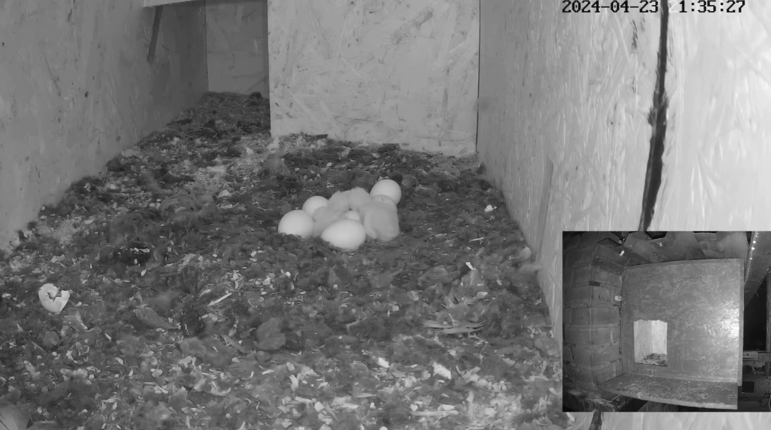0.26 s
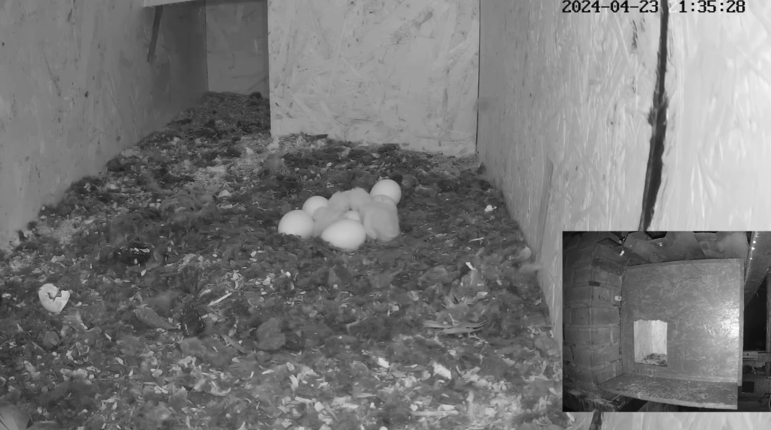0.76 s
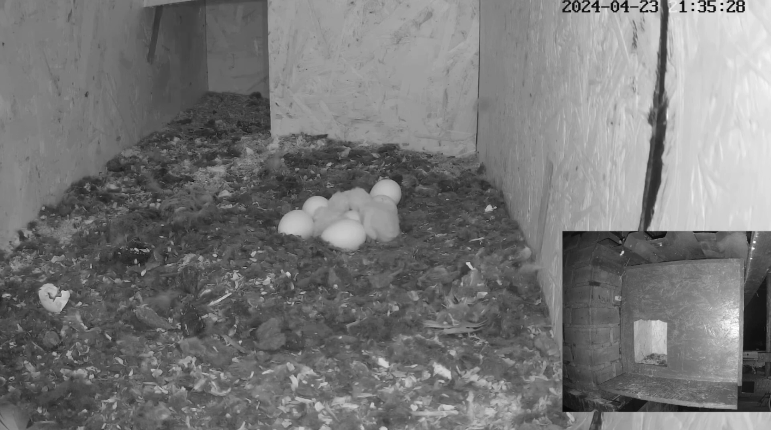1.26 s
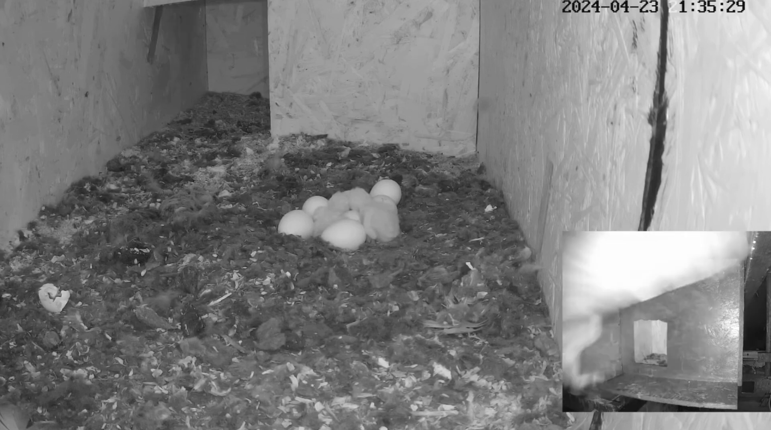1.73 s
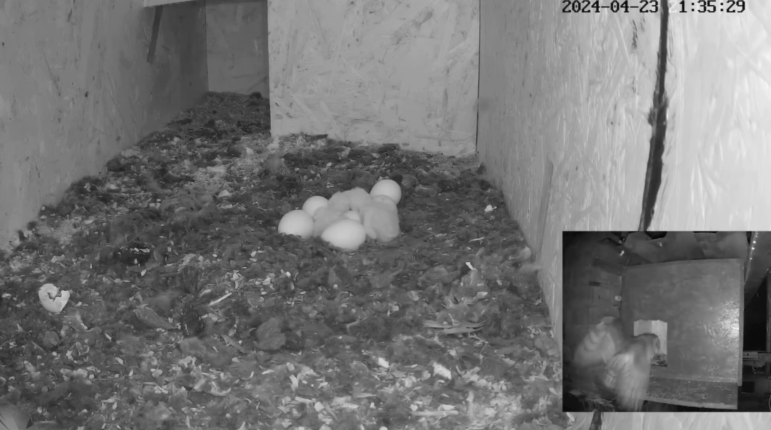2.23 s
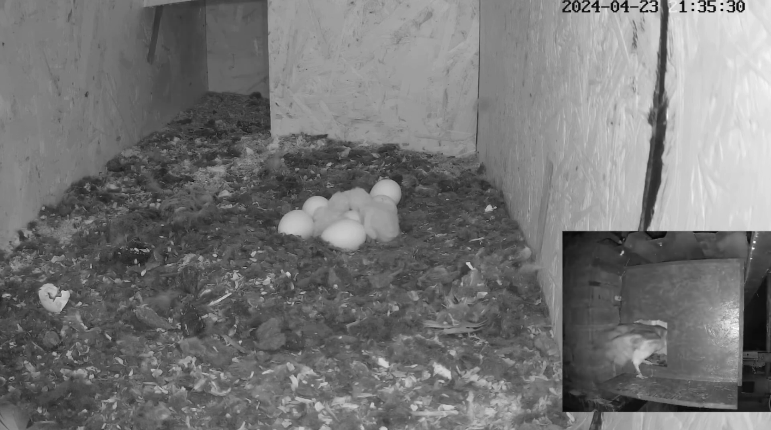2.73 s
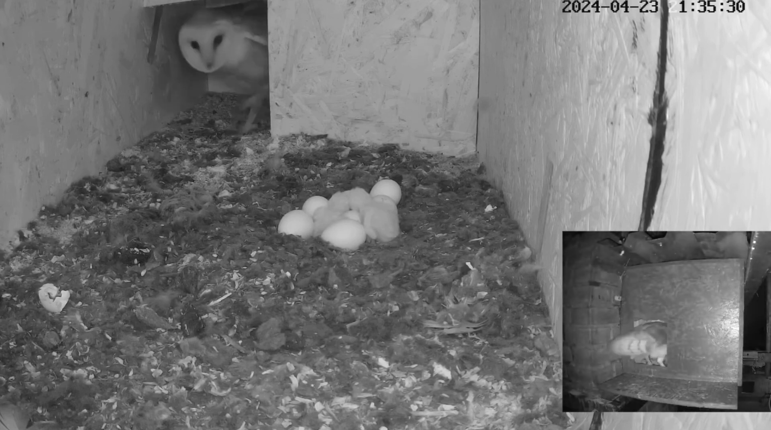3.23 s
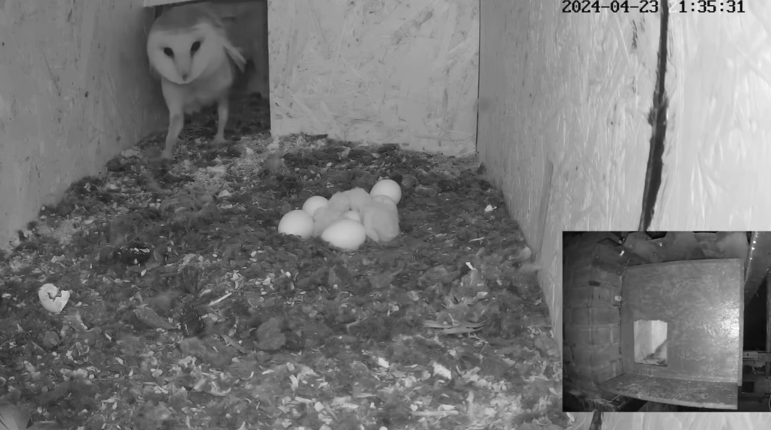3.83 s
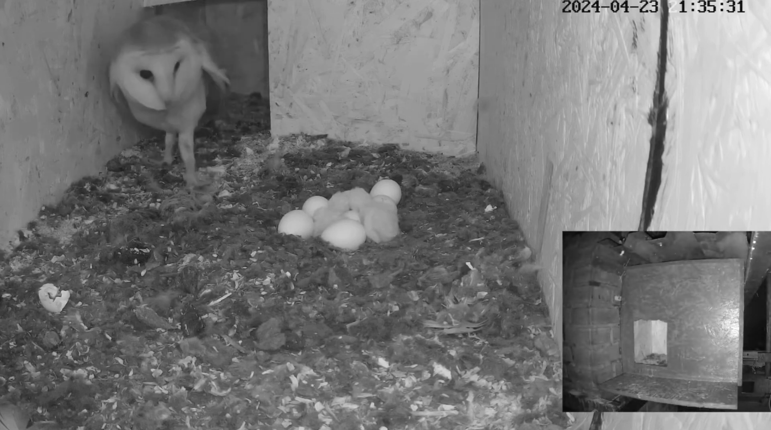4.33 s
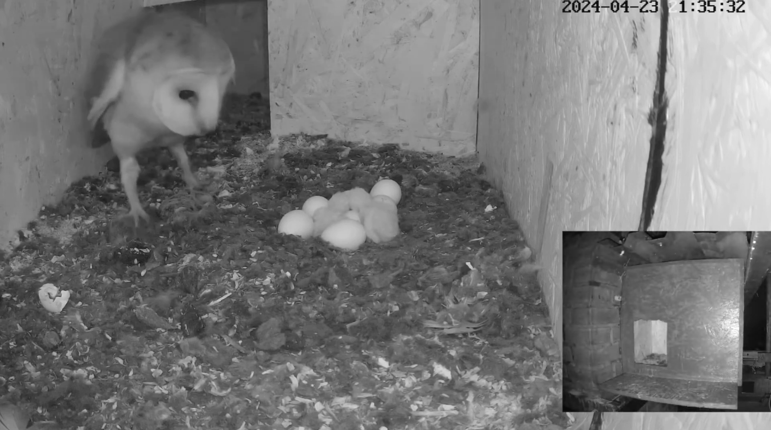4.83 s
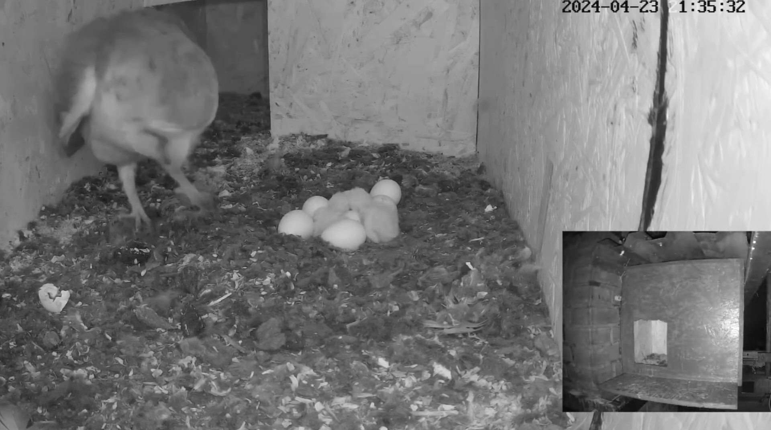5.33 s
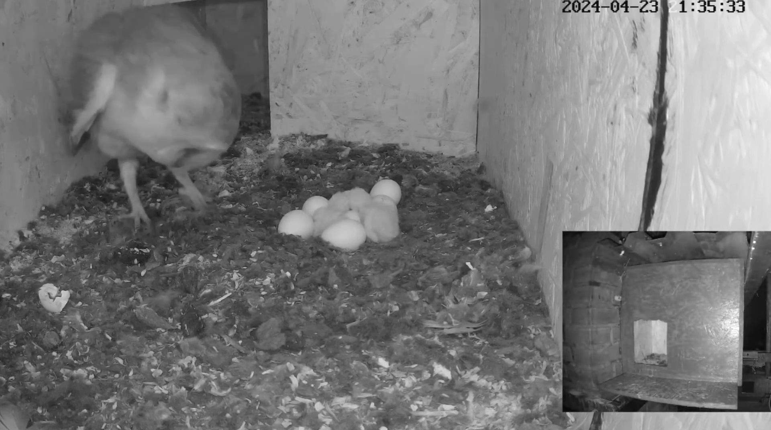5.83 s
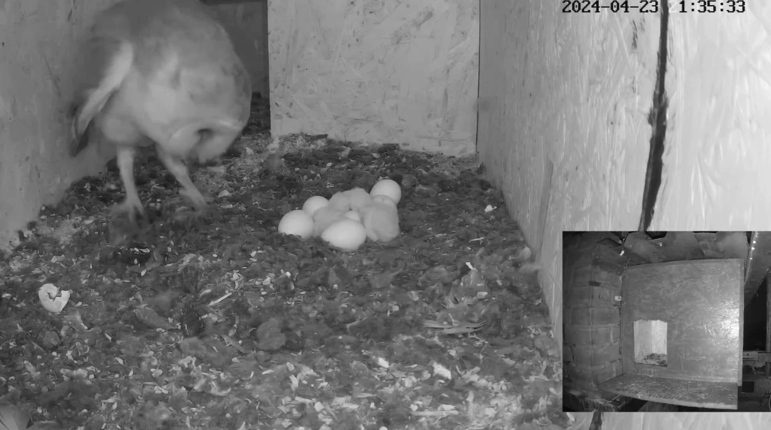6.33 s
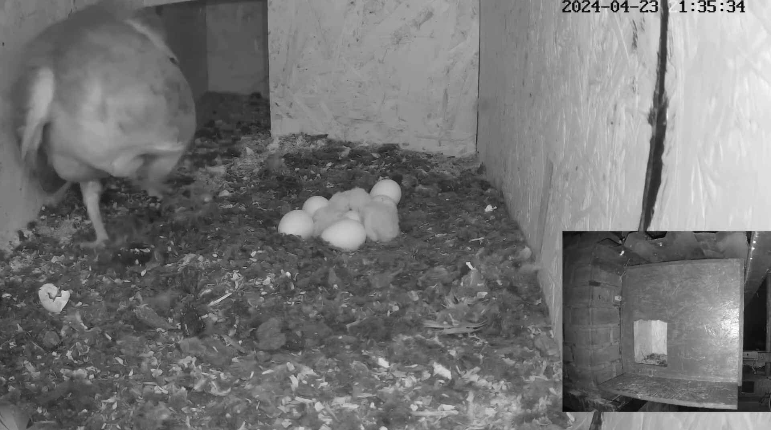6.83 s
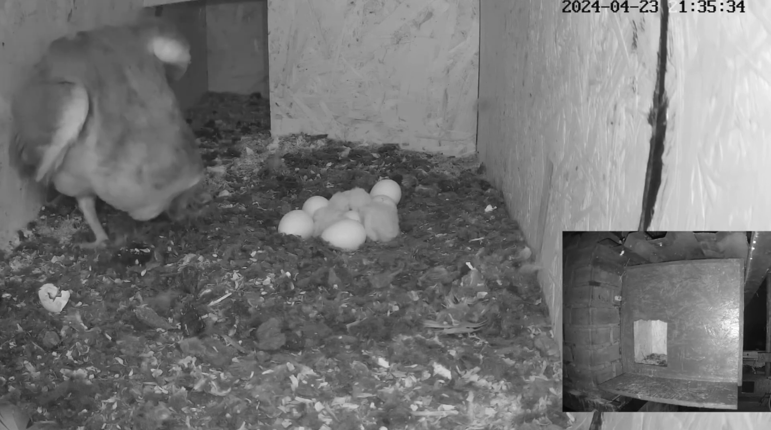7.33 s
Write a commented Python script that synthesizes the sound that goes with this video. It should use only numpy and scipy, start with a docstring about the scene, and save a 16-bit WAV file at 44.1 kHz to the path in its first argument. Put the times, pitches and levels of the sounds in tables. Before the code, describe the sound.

Barn owl chicks chitter in six quick, high trills of raspy rising notes, with a few thin peeps, inside a wooden nest box. After the first trill, wingbeats push air at the microphone and an adult lands on the box with a loud thump. Its claws scrabble and knock on the wood, then it pads in with soft steps and shuffles. The small, close microphone adds a steady hiss and low rumble.

```python
"""Barn owl chicks chitter in six quick trills inside a wooden nest box at night. Each syllable is a rasp, a
rising sweep and soft trailing notes, made in the syrinx and coloured by the throat and the close walls. An
adult lands on the box with a thump, scrabbles at the entrance and walks in over the litter, its feet ringing
the boards and panels. Its wings push air at a small microphone in swells of low rumble, over the microphone's
own steady hiss."""
import sys
import numpy as np
from scipy import signal
from scipy.fft import rfft, irfft, next_fast_len
from scipy.io import wavfile
from scipy.ndimage import uniform_filter1d, map_coordinates

SR = 44100
rng = np.random.default_rng(int(sys.argv[2]) if len(sys.argv) > 2 else 0)


def generate_wav(signal):
    """Clip the signal to [-1, 1] and save it as 16-bit WAV at the path in sys.argv[1]."""
    frames = np.transpose(np.atleast_2d(signal))
    scaled = np.clip(frames, -1, 1) * 32767
    pcm = np.round(scaled).astype(np.int16)
    wavfile.write(sys.argv[1], SR, pcm)


N = 334278
TIME = np.arange(N) / SR

# the boom of the heavy boards: pitch_hz, level_db, t60_s
BOARD_BOOM = [(132.7, -5, 0.3), (153.8, -10.5, 0.47), (229.3, -8, 0.33), (289, -56, 0.025),
              (346.7, 3, 0.17), (378.7, -0.5, 0.089), (428, 0.5, 0.021), (554, -11, 0.18),
              (654, -35, 0.066)]
# soft, heavy pushes that rock the floor: start_s, level_db
FLOOR_PUSHES = [(1.491, -39.5), (5.025, -39.5), (7.204, -42)]


def amp(db):
    """Decibels to gain."""
    return 10 ** (np.asarray(db) / 20)


def unit_rms(x):
    """Scales to rms 1."""
    return x / np.sqrt(np.mean(x ** 2) + 1e-20)


def unit_crest(x):
    """Scales so that the loudest 10 ms have rms 1."""
    return x / np.sqrt(uniform_filter1d(x ** 2, size=441).max() + 1e-20)


def gain_at(curve, hz):
    """Reads the gain of an EQ curve on a log-frequency axis."""
    curve_hz, curve_db = np.transpose(curve)
    return amp(np.interp(np.log(hz + 1), np.log(curve_hz + 1), curve_db))


def equalise(x, curve):
    """Filters by an EQ curve."""
    size = next_fast_len(len(x))
    return irfft(rfft(x, size) * gain_at(curve, np.fft.rfftfreq(size, 1 / SR)), size)[:len(x)]


def wander(count, hz):
    """Smooth random motion of rms 1 that changes about hz times a second."""
    steps = np.arange(count) * hz / SR
    return unit_rms(map_coordinates(rng.standard_normal(8192), [steps], order=3, mode="wrap"))


def progress(length_s):
    """Runs from 0 to 1 over a note."""
    return np.linspace(0, 1, round(length_s * SR))


def arch(u, crest):
    """Rises from 0 to 1 at the crest and falls back."""
    return np.interp(u, [0, crest, 1], [0, 1, 0])


def add(mix, start_s, sound):
    """Mixes a sound in at its start time."""
    part = mix[max(round(start_s * SR), 0):][:len(sound)]
    part += sound[:len(part)]


def microphone_hiss(level_db=-56.5):
    """The microphone's own steady hiss and rumble."""
    # noise floor EQ: freq_hz, gain_db
    hiss_eq = [(25, -3), (65, -1.5), (110, -3.5), (330, -9), (1000, -14), (2000, -17.5), (5000, -21),
               (13500, -25)]
    return amp(level_db) * unit_rms(equalise(rng.standard_normal(N), hiss_eq))


def draught():
    """Slow air pressure on the microphone, strongest under the wingbeats."""
    # fader moves of the moving air: time_s, level_db
    fader = [(0.0, -54), (0.95, -53.5), (1.05, -38), (1.45, -41.5), (1.68, -51.5), (3.5, -53.5),
             (4.16, -58.5), (4.28, -48), (4.96, -58), (5.0, -48.5), (5.51, -59), (7.41, -50), (7.58, -55)]
    # its sub-heavy EQ: freq_hz, gain_db
    air_eq = [(10, -9), (22, -5), (38, 0.5), (52, -7.5), (70, -19.5), (110, -30.5), (250, -35), (600, -82)]
    air = equalise(rng.standard_normal(N), air_eq)
    steady_air = air / np.sqrt(uniform_filter1d(air ** 2, size=8000))
    return steady_air * amp(np.interp(TIME, *np.transpose(fader)))


def ring(force, modes):
    """A force drives damped wooden modes."""
    t = np.arange(SR // 4) / SR
    response = sum(amp(db) * np.exp(-np.log(1000) * t / t60) * np.sin(2 * np.pi * hz * t)
                   for hz, db, t60 in modes)
    return signal.fftconvolve(force, response)[:len(force)]


def floor_boards(sway_hz=43, sway_decay_s=0.12, shove_s=0.0029, shove_db=3):
    """The owl's weight shoves the floor and rocks it; its shuffling keeps the boards murmuring."""
    # feet and feathers shuffling on the boards: time_s, level_db
    shuffle_fader = [(2.3, -80), (2.72, -56.5), (3.03, -66), (4.52, -73), (4.86, -63), (5.4, -69.5)]
    thuds, t = np.zeros(N), np.arange(SR // 3) / SR
    sway = np.exp(-t / sway_decay_s) * np.sin(2 * np.pi * sway_hz * t)
    shove = t / shove_s * (2 - t / shove_s) * np.exp(1 - t / shove_s)
    for start_s, db in FLOOR_PUSHES:
        add(thuds, start_s, amp(db) * (sway + amp(shove_db) * shove))
    shuffle_gain = amp(np.interp(TIME, *np.transpose(shuffle_fader), left=-100, right=-100))
    friction = rng.standard_normal(N) * amp(2.2 * wander(N, 60))
    return thuds + shuffle_gain * unit_rms(ring(friction, BOARD_BOOM))


def judder(press, modes):
    """Each mode gathers the energy of many small contacts and leaks it away; the contacts jog its phase."""
    t, out = np.arange(len(press)) / SR, 0
    for hz, db, t60 in modes:
        retained = np.exp(-2 * np.log(1000) / (t60 * SR))
        energy = signal.lfilter([1], [1, -retained], press ** 2)
        phase = 2 * np.pi * (hz * t + rng.random()) + wander(len(t), hz / 6)
        out = out + amp(db) * np.sqrt(energy / energy.max()) * np.sin(phase)
    return out


def footfall(rise_s, decay_s, boom_db, knock_db, scrape_db, bright_hz, focus_db_per_octave=0):
    """A cluster of tiny contacts booms the boards, knocks the panels and scrapes the wood."""
    # the knock of the thin panels: pitch_hz, level_db, t60_s
    panel_knock = [(541, -6.5, 0.099), (696, 2.5, 0.012), (788, -4, 0.024), (964, 1, 0.043),
                   (1066, 2, 0.015), (1396, -1, 0.064), (1680, -6, 0.038), (1847, -1.5, 0.058),
                   (2170, -3, 0.064)]
    # EQ of claws on wood: freq_hz, gain_db
    scrape_eq = [(600, -30), (1250, -6), (1700, -3), (2050, -3.5), (2500, -1), (2900, 0.5), (3800, -4),
                 (5400, -4), (13000, -4)]
    t = np.arange(SR // 3) / SR
    press = np.minimum(t / rise_s, 1) * np.exp(-np.maximum(t - rise_s, 0) / decay_s)
    grit = press * rng.standard_normal(len(t)) * amp(3 * wander(len(t), 747))
    lowpass = signal.butter(3, bright_hz, fs=SR)
    scrape = signal.lfilter(*lowpass, equalise(grit, scrape_eq))
    # claws wake the panels' high modes, soft pads the low ones
    tilt_db = np.clip(scrape_db - knock_db, -7, 9)
    panels = [(hz, db + tilt_db * np.log2(hz / 1000), t60) for hz, db, t60 in panel_knock]
    # focus favours the boards' main mode, as a soft pad does
    boards = [(hz, db - focus_db_per_octave * min(abs(np.log2(hz / 343)), .5), t60)
              for hz, db, t60 in BOARD_BOOM]
    boom = amp(boom_db) * unit_crest(judder(press, boards))
    knock = amp(knock_db) * unit_crest(judder(press, panels))
    return boom + knock + amp(scrape_db) * unit_crest(scrape)


def footwork():
    """The adult's sharp claw strikes, padding steps, and the brief contact of each heavy push."""
    # claws scrabbling on wood: start_s, rise_s, decay_s, boom_db, knock_db, scrape_db, bright_hz
    claw_strikes = [(1.415, 0.0055, 0.021, -39.5, -35.5, -44.5, 4230),
                    (1.437, 0.0025, 0.025, -39, -43, -43.5, 5400),
                    (1.462, 0.0046, 0.013, -69, -58, -44, 5370),
                    (1.49, 0.0021, 0.0046, -38.5, -46.5, -46, 3000),
                    (1.55, .01, 0.11, -68, -76, -60.5, 3200), (1.819, 0.00075, 0.016, -54, -48, -50, 2600),
                    (2.020, 0.015, 0.014, -41.5, -40.5, -36, 3900),
                    (2.128, 0.00087, .011, -51, -46, -35, 2720), (2.33, .001, .005, -72, -66, -58, 3500),
                    (2.505, 0.00089, 0.055, -43, -55.5, -53.5, 3200),
                    (2.950, 0.0018, 0.0049, -52.5, -52, -55.5, 2200),
                    (6.653, 0.0014, 0.0031, -55.5, -57, -49.5, 14000)]
    # soft steps on the boards: start_s, decay_s, boom_db
    soft_steps = [(1.976, 0.04, -48), (2.15, 0.013, -38), (2.193, 0.011, -41.5), (3.309, 0.19, -50),
                  (3.419, 0.021, -43), (3.646, 0.064, -57), (3.789, 0.0053, -49), (4.609, 0.068, -48.5),
                  (6.707, 0.0046, -46.5), (6.752, 0.01, -52)]
    out = np.zeros(N)
    for start_s, *strike in claw_strikes:
        add(out, start_s, footfall(*strike))
    for start_s, decay_s, db in soft_steps:
        add(out, start_s, footfall(0.0017, decay_s, boom_db=db, knock_db=db - 13.5, scrape_db=db - 16,
                                   bright_hz=2200, focus_db_per_octave=6.5))
    for start_s, db in FLOOR_PUSHES:
        add(out, start_s, footfall(0.0011, 0.0024, boom_db=db - 13.5, knock_db=db - 15.5,
                                   scrape_db=db - 20.5, bright_hz=4500))
    return out


def landing(start_s=1.122, skid_s=0.018, perch_db=-23.5):
    """The talons hit the box one foot after the other, skid briefly on the perch and set it ringing."""
    # the ring of the perch: pitch_hz, level_db, t60_s
    perch_ring = [(299, -13, 0.19), (996, -7, 0.019), (1101, -6.5, 0.065), (1137, -22, 0.062),
                  (1793, -18, 0.084), (2430, -18.5, 0.062)]
    out, press = np.zeros(N), np.zeros(SR // 4)
    add(press, 0, signal.windows.tukey(round(skid_s * SR), .7))
    add(out, start_s, amp(perch_db) * unit_crest(judder(press, perch_ring)))
    first_foot = footfall(0.0017, 0.013, boom_db=-37.5, knock_db=-34.5, scrape_db=-40.5, bright_hz=2730)
    second_foot = footfall(0.0024, 0.018, boom_db=-37, knock_db=-40.5, scrape_db=-46, bright_hz=2400)
    add(out, start_s - 0.001, first_foot)
    add(out, start_s + 0.011, second_foot)
    return out


def nest_box(x, width_hz=45, lift_db=5, between_db=-2, echo_t60_s=.04, echo_db=-17):
    """Close wooden walls favour some pitches and add a very short, dense echo."""
    # standing waves between the walls: pitch_hz
    standing_waves = [2080, 3098, 3544, 4050, 4510, 4590, 4900, 7100]
    hz = np.fft.rfftfreq(N, 1 / SR)
    peaks = sum(np.exp(-((hz - centre) / width_hz) ** 2) for centre in standing_waves)
    boxy = irfft(rfft(x) * amp(between_db + lift_db * peaks), N)
    t = np.arange(SR // 8) / SR
    taps = rng.standard_normal(len(t)) * (t > .002) * np.exp(-np.log(1000) * t / echo_t60_s)
    return boxy + amp(echo_db) * signal.fftconvolve(boxy, taps / np.linalg.norm(taps))[:N]


def rasp_envelope(length_s, attack_s=0.0038, release_s=0.021):
    """A rasp starts abruptly, holds and fades."""
    t = np.arange(0, length_s, 1 / SR)
    return np.minimum(t / attack_s, 1) * np.sqrt(np.minimum((length_s - t) / release_s, 1))


def rasps(effort, pitch_hz=2330, chaos=.1, air_db=-6, flutter_db=1.8):
    """Before a note locks in, the syrinx rattles around its pitch and air hisses through the throat."""
    # EQ of the rasp: freq_hz, gain_db
    rasp_eq = [(1000, -9.5), (2550, -16), (3450, 4.5), (4100, 1.5), (4700, -0.5), (5200, -1), (5750, -3),
               (6500, 0.5), (7300, -22), (8000, -11.5), (8500, -18), (10000, -20), (13000, -22)]
    phase = 2 * np.pi * np.cumsum(pitch_hz * (1 + chaos * wander(N, 900))) / SR
    rattle = unit_rms(sum(np.sin(k * phase) for k in range(1, 6)))
    air = amp(air_db) * rng.standard_normal(N)
    flutter = amp(flutter_db * wander(N, 450))
    return effort * unit_rms(equalise((rattle + air) * flutter, rasp_eq))


def syrinx(pitch, swell_db, tilt_db, jitter, onset_jitter, shimmer_db):
    """A tone of rms 1, shakiest at its onset; harmonics light up as they cross the throat resonance."""
    # resonances of a chick's throat and beak: freq_hz, gain_db
    throat_eq = [(1500, -14.5), (2150, -13.5), (2700, -12.5), (3500, -4.5), (4200, -4), (4850, 6.5),
                 (5350, -1), (5650, -5.5), (6400, -2), (7300, -9.5), (8000, -19), (8500, -9), (9400, -21),
                 (13000, -32)]
    u = np.linspace(0, 1, len(pitch))
    unsteadiness = jitter + onset_jitter * (1 - u) ** 4
    pitch = pitch * (1 + unsteadiness * wander(len(u), 1470))
    phase = 2 * np.pi * np.cumsum(pitch) / SR
    voice = sum(amp(tilt_db * np.log2(k)) * gain_at(throat_eq, k * pitch) * np.sin(k * phase)
                for k in range(1, 5))
    swell = amp(swell_db + shimmer_db * wander(len(u), 256))
    return unit_rms(voice * swell * signal.windows.tukey(len(u), .25))


def peeps(sag=.17, top_at=0.4, rasp_share=0.61):
    """Arching whistles come out of rasps; gives the notes and the effort behind the rasps."""
    # peeps around the edges of trills: start_s, length_s, level_db, top_hz, rasp_db
    peep_cues = [(0.614, 0.022, -49.5, 3420, -51), (2.114, 0.092, -48.5, 3565, -54.5),
                 (3.434, 0.085, -48.5, 3464, -47.5), (4.501, 0.042, -41.5, 3490, -58),
                 (4.609, 0.021, -49.5, 3100, -47), (7.385, 0.038, -49.5, 2930, -49)]
    voice, effort = np.zeros(N), np.zeros(N)
    for start_s, length_s, db, top_hz, rasp_db in peep_cues:
        u = progress(length_s)
        bend = sag * length_s / .085  # longer peeps bend further
        pitch = top_hz * (1 - bend * (2 * (u - top_at)) ** 2)
        note = syrinx(pitch, 9 * arch(u, 0.65), tilt_db=-5.5,
                      jitter=0.0094, onset_jitter=0.044, shimmer_db=2.5)
        add(voice, start_s, amp(db) * note)
        add(effort, start_s, amp(rasp_db) * rasp_envelope(rasp_share * length_s))
    return voice, effort


def whistle(length_s, from_hz, to_hz, sag=0.022, detune=0.0167):
    """A thin slide of the syrinx's higher voice; it flattens out towards its low end."""
    u = progress(length_s)
    slide = np.geomspace(from_hz, to_hz, len(u))
    pitch = slide * (1 - sag * np.sin(np.pi * u) + detune * rng.standard_normal())
    return syrinx(pitch, 4 * arch(u, 0.17), tilt_db=-9.5, jitter=0.03, onset_jitter=0.028, shimmer_db=4)


def falling_note(length_s=.032, from_hz=2650, to_hz=2047, detune=0.032):
    """A softer note slides back down, a little differently each time."""
    ends_hz = np.multiply([from_hz, to_hz], 1 + detune * rng.standard_normal(2))
    u = progress(length_s)
    pitch = np.interp(u, [0, 1], ends_hz)
    return syrinx(pitch, 4 * arch(u, 0.87), tilt_db=-11.5,
                  jitter=0.011, onset_jitter=0.02, shimmer_db=3.5)


def sweep(low_hz, top_hz, climb_s, overshoot_s=.006, full_voice_hz=2060):
    """The loud note of a syllable swells, climbs in an S-curve and breaks off just past the top."""
    t = np.arange(-climb_s, overshoot_s, 1 / SR)
    pitch = low_hz + (top_hz - low_hz) * np.cos(np.pi / 2 * t / climb_s) ** 2
    swell_db = np.interp(np.linspace(0, 1, len(t)), [0, 0.67, 1], [-5, 8, 2])
    weakness_db = 10 * np.maximum(np.log2(full_voice_hz / pitch), 0)
    return syrinx(pitch, swell_db - weakness_db, tilt_db=1,
                  jitter=0.014, onset_jitter=0.037, shimmer_db=3.5)


def trills(climb_s=.034, max_rasp_s=0.0645, gap_share=0.59, opening_hold_s=0.019, fade_s=0.0014):
    """Chicks string about eleven syllables a second; gives the notes and the effort behind the rasps."""
    # the six trills: start_s, end_s, lead_in_db
    trill_cues = [(0.113, 0.605, -57), (1.716, 2.14, -51.5), (3.018, 3.449, -52.5), (4.135, 4.638, -58),
                  (6.118, 6.505, -57), (7.378, 7.62, -60)]
    # their syllables: top_s, sweep_db, low_hz, top_hz, rasp_db, fall_db, whistle_db
    syllable_cues = [(0.14, -41.5, 2350.0, 2650.0, -45.5, -56, -60),
                     (0.208, -38.5, 1900.0, 2800, -47, -47, -55),
                     (0.296, -39.5, 2140, 2880, -44, -48.5, -53),
                     (0.393, -41.5, 2145, 2880, -44.5, -47, -56),
                     (0.491, -40, 2265, 2880, -46.5, -47.5, -58),
                     (0.582, -44.5, 1805, 2740, -45.5, -55, -54),
                     (1.739, -43, 2150.0, 2575.0, -53, -72, -76),
                     (1.803, -37.5, 1736, 2650, -45, -50, -50.5), (1.889, -43.5, 1790, 2790, -49, -69, -47),
                     (1.989, -44.5, 2365, 3010, -48.5, -62, -44.5),
                     (2.081, -44.5, 2180, 2940, -47.0, -55, -51), (3.043, -49, 1745, 2835, -44, -62, -53),
                     (3.123, -38, 1550.0, 2650.0, -48.0, -55, -51),
                     (3.203, -39.0, 1440, 2730, -44.5, -62, -45),
                     (3.304, -43.0, 1980, 2864, -48.0, -57, -47.5),
                     (3.399, -39, 1460, 2650.0, -49.0, -55.5, -52.5),
                     (4.163, -48.5, 2000.0, 2290, -44.5, -64, -56),
                     (4.235, -39, 1410, 2825.0, -44.5, -46.5, -57),
                     (4.326, -39.5, 1916, 2796, -45, -50, -50.5),
                     (4.423, -39, 1770, 3000.0, -45, -52, -46.5), (4.622, -47.5, 1413, 2870, -47, -62, -61),
                     (6.142, -51.5, 2250.0, 2720, -48, -75, -76), (6.21, -38, 1477, 2590, -47.5, -60, -57),
                     (6.299, -41, 1890, 2670, -48, -74, -54.5), (6.391, -43.0, 1700.0, 2710, -52, -73, -60),
                     (6.491, -46.5, 1960, 3170, -48.5, -62, -60), (7.483, -38, 1520, 2680, -59, -66, -48),
                     (7.574, -43, 1980, 2740, -47, -62, -63)]
    # a rasp with no sweep of its own: start_s, length_s, level_db
    bare_rasps = [(4.46, 0.06, -46)]
    voice, effort = np.zeros(N), np.zeros(N)
    for start_s, end_s, lead_in_db in trill_cues:
        notes, previous_s = np.zeros(N), start_s
        syllables = [row for row in syllable_cues if start_s < row[0] < end_s]
        for index, (top_s, db, low_hz, top_hz, rasp_db, fall_db, whistle_db) in enumerate(syllables):
            if index == 0:  # the opening syllable rasps throughout
                lead_s, hold_s = top_s - start_s, opening_hold_s
            else:
                lead_s, hold_s = min(max_rasp_s, gap_share * (top_s - previous_s)), 0
            if index > 1:  # once the trill is running, a whistle rises into each rasp
                lead_in = whistle(0.0207, from_hz=2820, to_hz=3480)
                add(notes, top_s - lead_s - .003, amp(lead_in_db) * lead_in)
            add(effort, top_s - lead_s, amp(rasp_db) * rasp_envelope(lead_s + hold_s))
            add(notes, top_s - climb_s, amp(db) * sweep(low_hz, top_hz, climb_s))
            # the two sides of the syrinx trail off together
            add(notes, top_s + 0.0059, amp(fall_db) * falling_note())
            add(notes, top_s + .004, amp(whistle_db) * whistle(0.0312, from_hz=3450, to_hz=3000))
            previous_s = top_s
        gate = np.clip(np.minimum(TIME - start_s, end_s - TIME) / fade_s, 0, 1)
        voice += notes * gate
    for start_s, length_s, db in bare_rasps:
        add(effort, start_s, amp(db) * rasp_envelope(length_s))
    return voice, effort


def scene():
    """Chicks and adult in the box, over the microphone's hiss."""
    voice, effort = np.add(trills(), peeps())
    chicks = nest_box(voice + amp(-0.15) * rasps(effort))
    adult = landing() + footwork() + floor_boards() + draught()
    return (chicks + adult + microphone_hiss())[None]


def record(dry):
    """A steep low-pass takes off the highest treble."""
    lowpass = signal.firwin(401, cutoff=13750, window=("kaiser", 8), fs=SR)
    return signal.oaconvolve(dry, lowpass[None], "same")


dry = scene()
out = record(dry)
generate_wav(out)
```